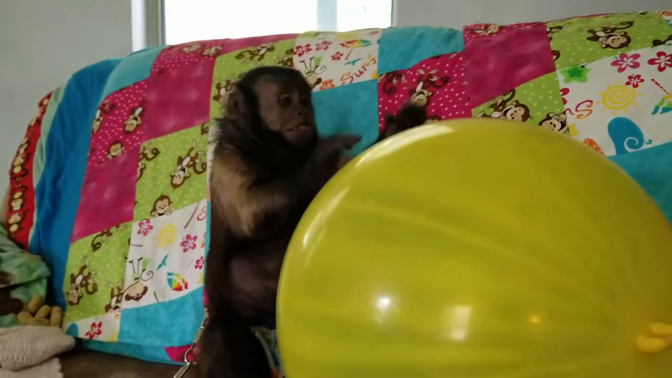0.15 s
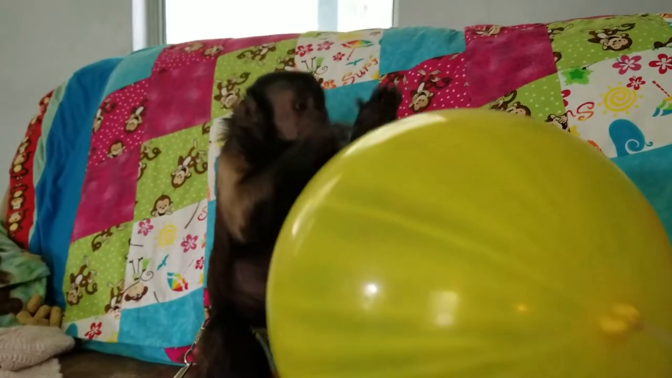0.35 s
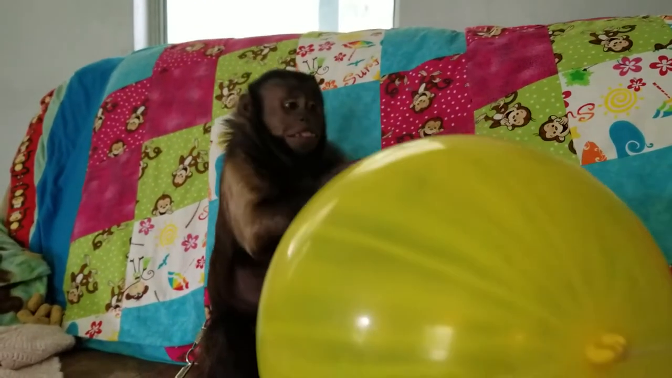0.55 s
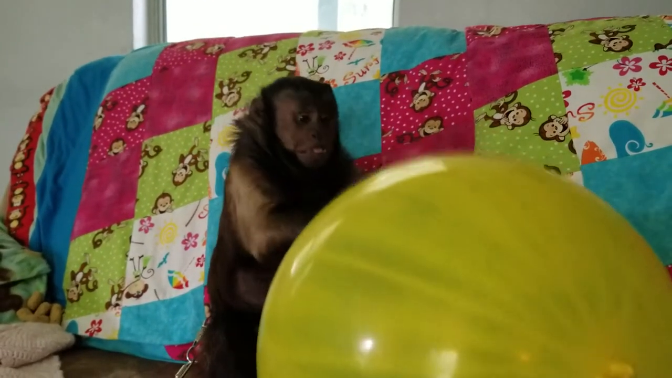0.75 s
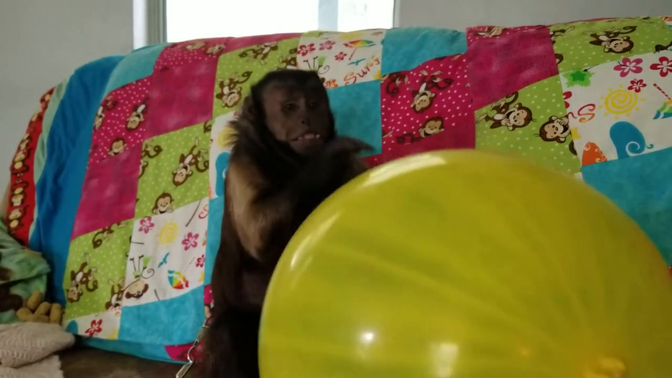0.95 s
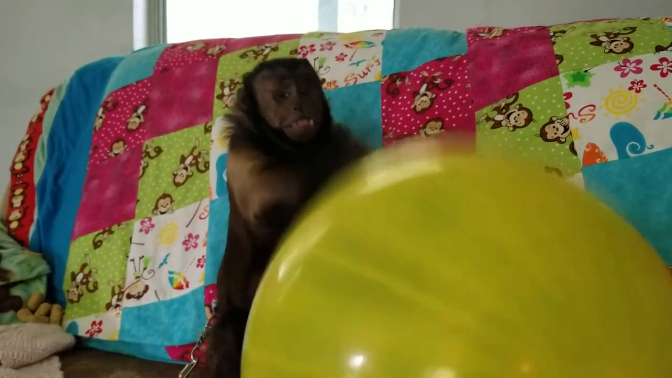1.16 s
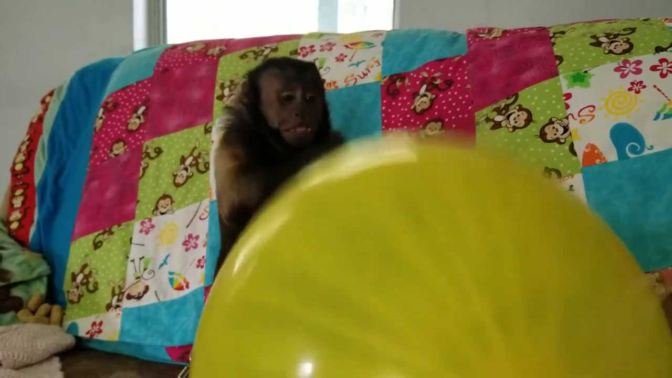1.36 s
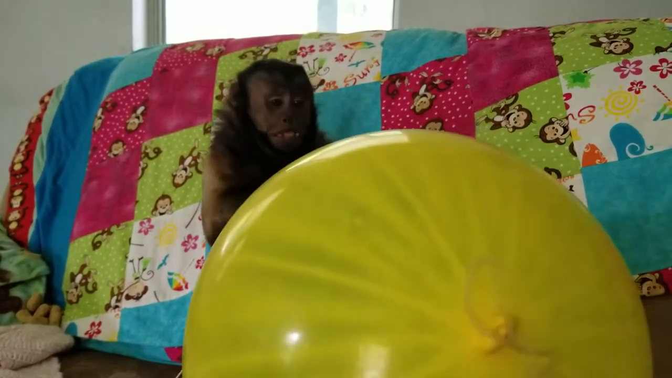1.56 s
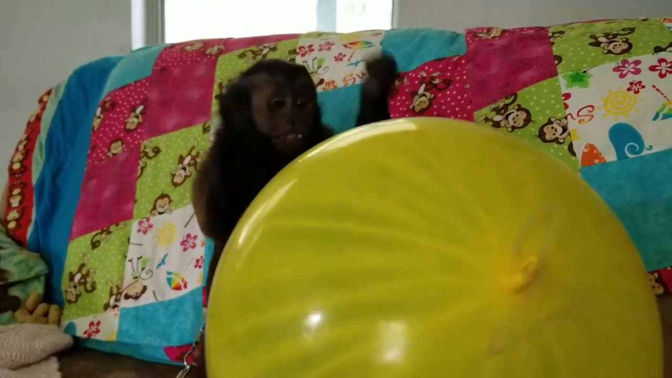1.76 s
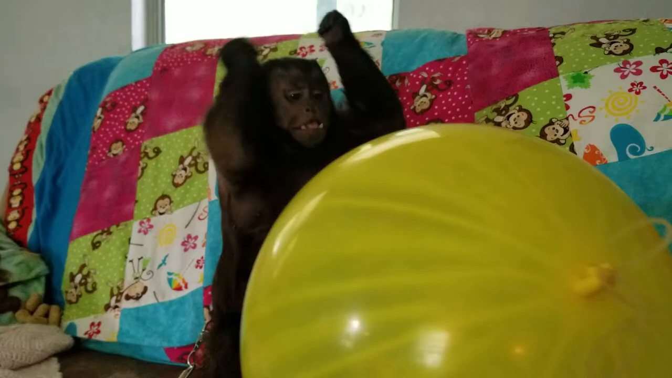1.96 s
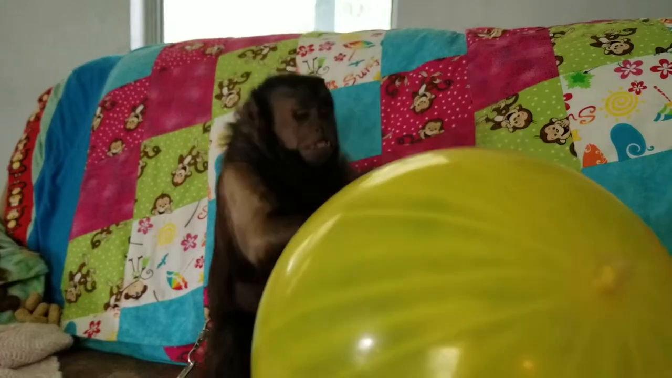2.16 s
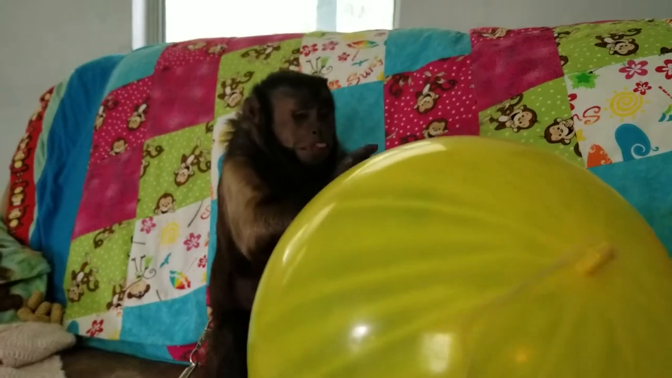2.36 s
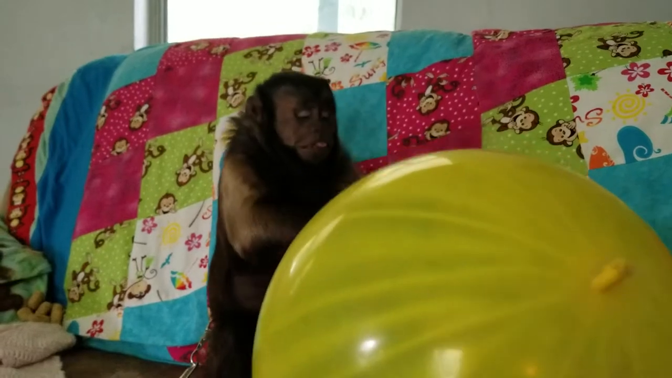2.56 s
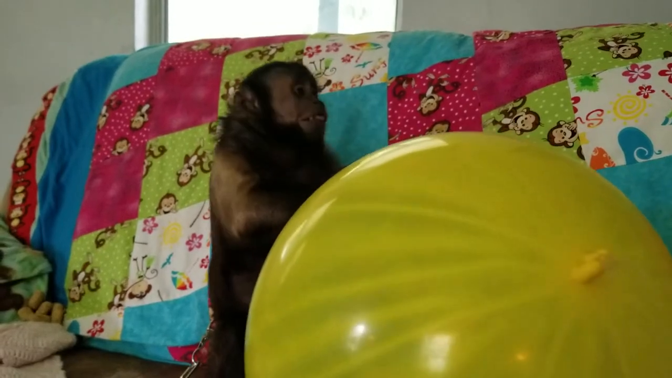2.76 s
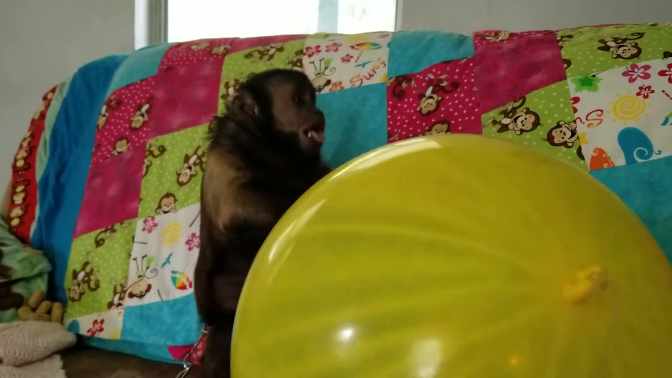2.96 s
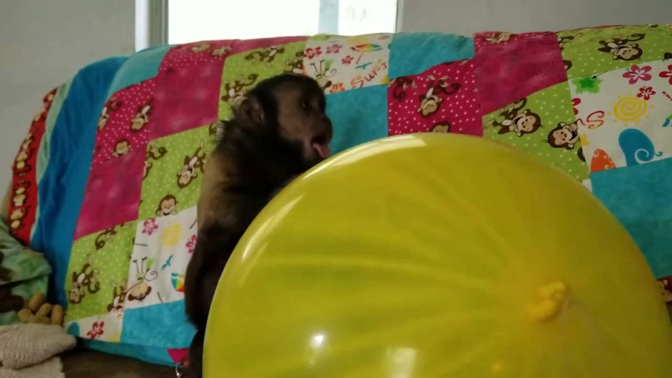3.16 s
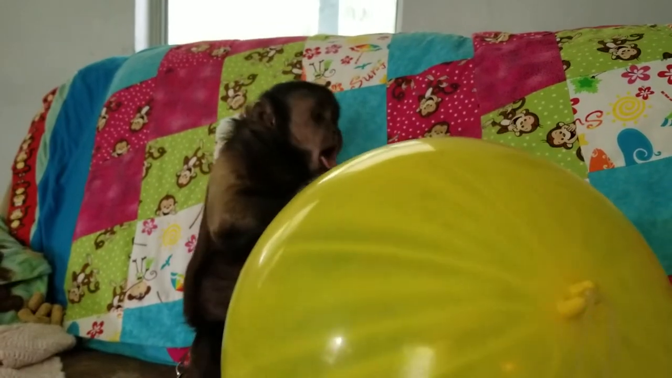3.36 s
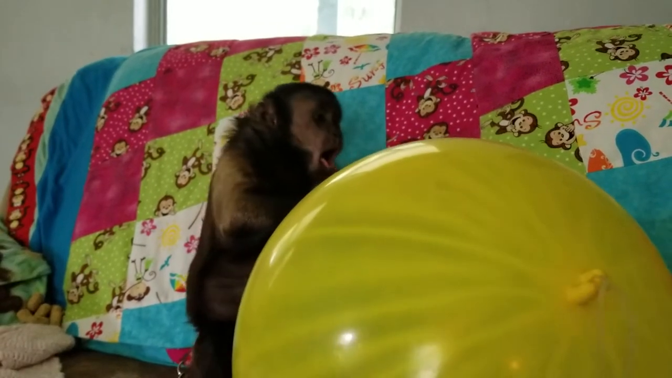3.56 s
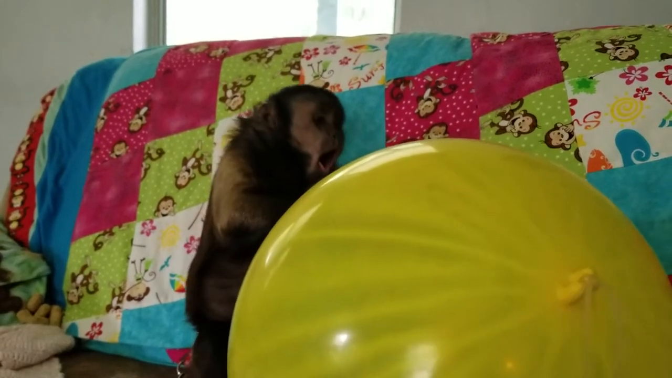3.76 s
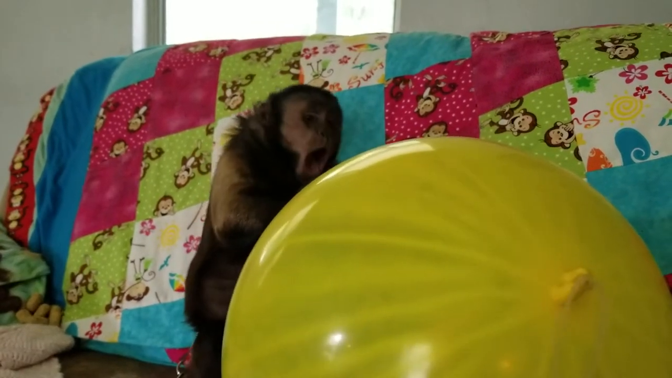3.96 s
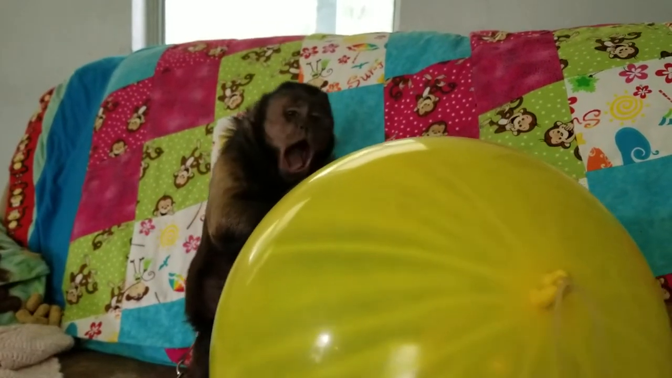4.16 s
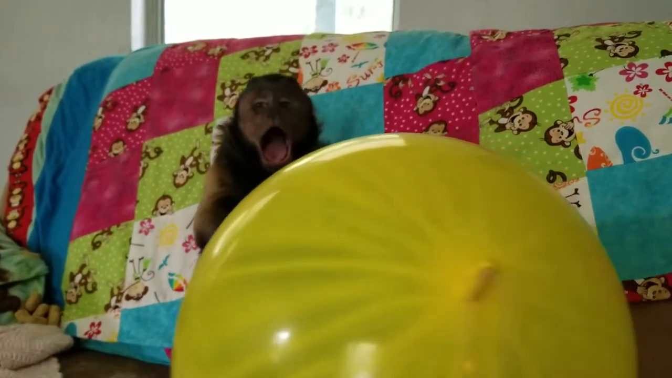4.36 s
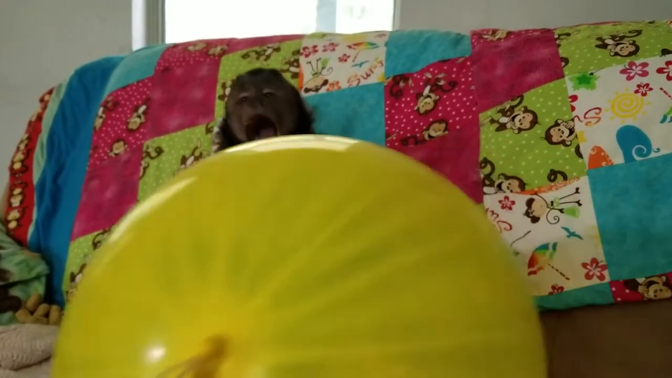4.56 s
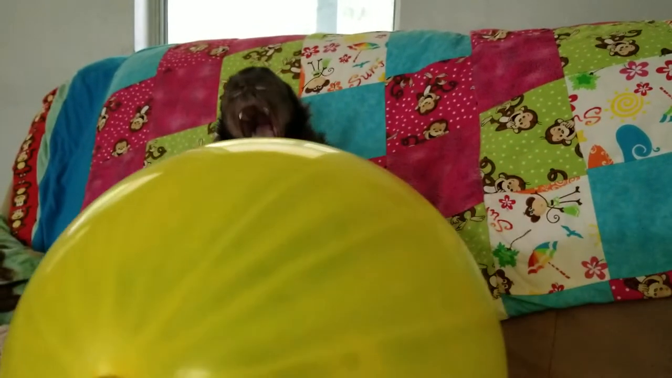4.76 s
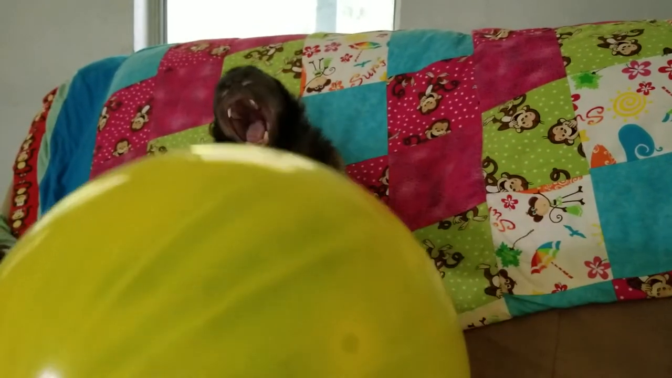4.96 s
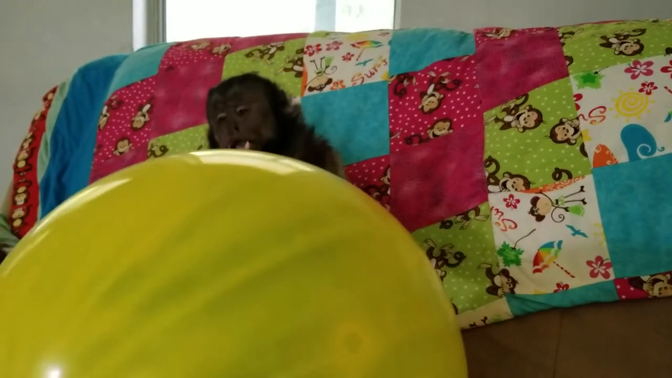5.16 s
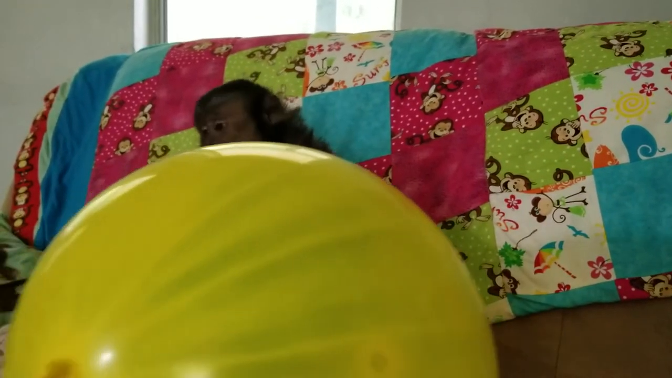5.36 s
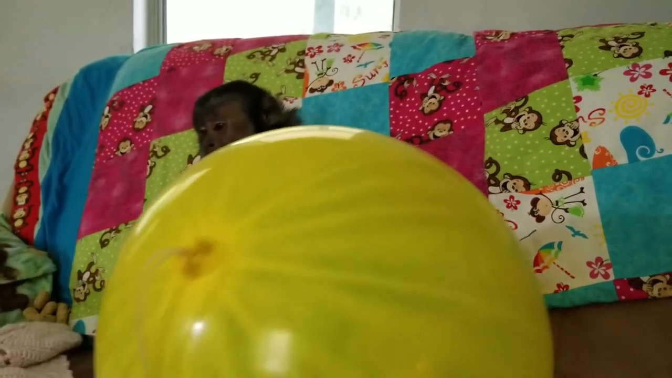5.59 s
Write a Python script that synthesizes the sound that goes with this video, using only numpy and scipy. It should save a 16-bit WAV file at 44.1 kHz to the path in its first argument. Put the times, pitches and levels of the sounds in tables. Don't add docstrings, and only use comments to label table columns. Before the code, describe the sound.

Indoors, close to a phone microphone with a steady low fan in the background, palms slap and rub a large latex balloon. Dull bassy blows ring and rock it, mixed with dry rubber rasps and fingertip flicks. The drumming pauses, returns briefly, then fades to faint brushing and light taps. Near the end come two quick swishing drags with a low groan and tiny high squeals, then only the fan.

```python
import sys
import numpy as np
from scipy import signal
from scipy.fft import rfft, irfft
from scipy.io import wavfile
from scipy.ndimage import uniform_filter1d

SR = 44100
rng = np.random.default_rng(int(sys.argv[2]) if len(sys.argv) > 2 else 0)


def master_out(mix):
    frames = np.transpose(np.atleast_2d(mix))
    ceiling = np.clip(frames, -1, 1)
    pcm = np.round(ceiling * 32767).astype(np.int16)
    wavfile.write(sys.argv[1], SR, pcm)


def volts_from_db(level):
    exponent = np.asarray(level, float) / 20
    return 10 ** exponent


N = 248150
T = np.arange(N) / SR
LONGEST = SR // 2

# frequency in Hz, level in dB per Hz.
FAN_COLOUR = [(20, -16), (40, -8), (66, 1.5), (114, -3.5), (145, -12), (260, -10), (420, -15), (600, -9),
              (1050, -6.5), (1900, -11.5), (2700, -10), (4500, -18.5), (6400, -29.5), (16000, -40.5)]
FAN_DB = -51

# start in seconds, peak in dB, push pitch in Hz, wobble minus peak in dB.
BLOWS = [(0.001, -35, 250, -0.5), (0.047, -26.5, 95, -9.5), (0.217, -38, 150, 6), (0.252, -29.5, 79.6, -2),
         (0.426, -17.5, 113, -6.5), (0.4525, -7, 154, -30), (0.462, -20, 218, -5.5), (0.481, -21, 101, -20),
         (0.509, -38, 100, 2), (0.558, -30.5, 247, -4), (0.722, -27.5, 75.5, 0), (0.772, -19.5, 71.6, -15),
         (0.942, -27, 109, -6.5), (1.159, -14.5, 113, -4), (1.1762, -15, 113, -12.5),
         (1.209, -26, 78.1, -4.5), (1.226, -27, 83.4, -21), (1.353, -24, 150, -0.5),
         (1.378, -6.5, 121, -22), (1.418, -20.5, 72.7, -7), (1.454, -31, 92, -13), (2.106, -19.5, 108, -6),
         (2.1165, -16, 50, -20), (2.1325, -14, 95, -17.5), (2.159, -38, 73.3, -6.5), (2.389, -37, 158, -5),
         (2.553, -32, 90, -1.5), (4.9805, -33.5, 80, -25)]
# start in seconds, peak in dB, push pitch in Hz.
NUDGES = [(0.021, -30.5, 99), (0.327, -27.5, 108), (0.799, -25, 72), (1, -30.5, 234), (1.062, -30, 90),
          (1.484, -38, 118), (1.51, -37, 73), (1.577, -35.5, 72.7), (1.631, -40, 223), (2.033, -38.5, 80),
          (2.19, -30, 90), (2.224, -42, 80), (2.286, -48, 95), (2.36, -28.5, 277), (2.589, -31.5, 80.7),
          (2.67, -41, 135), (2.946, -36, 100), (3.848, -37.5, 147), (4.197, -36.5, 112),
          (4.298, -42, 134.2), (4.398, -44.5, 72.7)]
NUDGE_WOBBLE_DB = -10
# frequency in Hz, level in dB, t60 in seconds.
SKIN_MODES = [(44.8, -9.5, 0.3), (63.2, -9, 0.75), (97.6, -4, 0.37), (135, -4, 0.38), (174, -5.5, 0.053),
              (241, -0.5, 0.1), (319.5, -9.5, 0.13), (500, -14, 0.087), (551, -5, 0.097), (534, -29, 0.06)]
WOBBLE_T60_S, WOBBLE_SLOPE = 0.17, -0.18
ROCK_DB, ROCK_SHARE = -29, 0.51
ROCK_RISE_S, ROCK_T60_S = 0.044, 0.76
ROCK_HZ, ROCK_DB_PER_OCTAVE = 85, 3.5
ROCK_FUR_DB, DRAG_RUMBLE_DB = -20, -3

# start in seconds, peak, body minus peak and air minus peak in dB.
SLAPS = [(0.0504, -29.5, -2, -8), (0.215, -27.5, -5, -8), (0.232, -30, -1, -9), (0.2874, -29.5, 0, -7.5),
         (0.4215, -22.5, -7.5, -8), (0.4624, -19.5, -5.5, -6.5), (0.484, -26.5, 3.5, -11),
         (0.5582, -35, -5, -10), (0.775, -32, 6, -6), (1.065, -33.5, -10, -7.5), (1.1554, -26.5, -16, -9),
         (1.1717, -20.5, -1.5, -5.5), (1.3847, -21, -7.5, 3), (1.404, -30, -6, -7), (1.442, -39, -2, -11),
         (1.6294, -46, -9, -1), (2.1385, -21.5, 2.5, -0.5), (2.158, -25.5, 0.5, -3), (2.3575, -39, 7, -12),
         (2.385, -39.5, -2, 1), (2.5264, -43, -3, 3), (2.585, -36.5, 8, 1), ]
SLAP_RISE_S, SLAP_T60_S = 0.0056, 0.13
# start in seconds, peak, body minus peak and air minus peak in dB.
WIPES = [(0.0044, -32, 1, -12), (0.2424, -31, -5, -5.5), (0.711, -30.5, -6, -3), (0.7994, -40, 2, -19),
         (0.935, -32.5, 1, -4), (0.9994, -42.5, -13, 1), (1.3535, -24.5, -10, -4),
         (2.1035, -19.5, -2.5, -5), (2.5536, -32.5, -2.5, -4), (3.849, -52, 14, -17)]
WIPE_RISE_S, WIPE_T60_S = 0.0088, 0.25
# start in seconds, peak, body minus peak and air minus peak in dB.
FLICKS = [(0.007, -30.5, 1, -9), (0.471, -18.5, 1, -5.5), (0.762, -27, 3.5, 0), (1.3985, -13.5, -2, -6),
          (1.4144, -22.5, 1, -10), (1.4345, -19.5, 3, -7), (2.145, -17, -1.5, -2.5), (2.3565, -35, 4, -10),
          (2.587, -36.5, 8, -8), (2.664, -37, 4, -1)]
FLICK_RISE_S, FLICK_T60_S = 0.003, 0.06
# start in seconds, peak, body minus peak and air minus peak in dB.
BRUSHES = [
    (2.765, -51, -14, 6),
    (2.96, -53, -8, 4),
    (3.045, -48, -9, 5),
    (3.22, -51, -5, 3),
]
BRUSH_RISE_S, BRUSH_T60_S = 0.04, 0.4
# time in seconds, speed as hiss in dB, grip in dB.
DRAGS = [
    [(4.15, -82, 15), (4.31, -63, -14), (4.416, -52.5, 5), (4.505, -54.5, -4), (4.535, -50, 9.5),
     (4.6, -45, 11.5), (4.655, -46, 10.5), (4.675, -61.5, 14.5), (4.742, -61.5, 12)],
    [(4.738, -61, 0), (4.78, -52, 2.5), (4.86, -45, 5), (4.915, -54, 10.5), (4.94, -46.5, 2),
     (4.985, -49.5, 3), (5.005, -67, 17), (5.06, -83, 22)],
]
GRIP_BODY_DB, GRIP_MIDDLE_DB = -8, -7
# frequency in Hz, level in dB per Hz.
RASP_COLOUR = [(200, -8), (330, 3.5), (750, -3), (960, -3.5), (1260, -3), (2900, -0.5), (3400, -2),
               (10400, -18), (15800, -16.5), (16400, -50.5)]
# frequency in Hz, level in dB per Hz.
FUR_COLOUR = [(2500, -28), (5000, -1.5), (9000, -4), (13000, -1), (20000, -4.5)]

# start
# in seconds, peak in dB, ring pitch in Hz.
PATCHES = [(0.244, -31, 650), (0.28, -32, 1828), (0.47, -26, 1820), (0.485, -27, 977), (1.172, -34, 638),
           (1.189, -35, 860), (1.387, -22.5, 2360), (1.399, -20, 667), (1.436, -26, 950),
           (2.105, -31, 2660), (2.143, -17.5, 1244), (2.159, -24, 2050), (2.386, -34, 1300),
           (2.587, -41, 884), (2.665, -36, 643), (4.976, -26.5, 238)]
PATCH_T60_S = 0.047
# start in seconds, peak in dB, ring pitch in Hz, bright crack in dB, t60 in seconds.
SNAPS = [
    (0.511, -30, 616, -18, 0.029),
    (0.56, -25.5, 938, -21, 0.012),
    (0.77, -21, 470, -16, 0.016),
    (1.171, -32, 526, -24, 0.032),
    (2.104, -21, 2640, -15, 0.016),
    (2.587, -26, 930, -17, 0.024),
    (2.666, -27.5, 620, -26, 0.014),
    (3.854, -35, 1340, -26, 0.0173),
]
# start in seconds, peak in
# dB.
TICKS = [(0.5595, -44), (0.999, -47), (1.4845, -41), (2.3575, -48), (2.3825, -42), (2.5097, -48),
         (4.8644, -46), (4.8704, -46), (4.8908, -33), (5.372, -44)]
# start in seconds, depth in dB, width in seconds, ring pitch in Hz.
POPS = [
    (1.1585, -27, .0009, 900),
    (1.4857, -21, .00038, 2850),
    (1.736, -32, .0005, 1500),
    (2.3587, -25, .0006, 1000),
    (2.3882, -29, .0005, 1300),
]

# start and length in seconds, slip rate in Hz, peak in dB, sharpness from 0 to 1.3.
GROANS = [
    (1.729, 0.03, 235, -45, 0.27),
    (4.526, 0.017, 232, -38.5, 0.3),
    (4.84, 0.028, 244.7, -40.5, 0.47),
    (4.885, 0.04, 240, -44.5, 0.13),
]
SQUEALS = [
    (4.568, .038, 930, -39.5, .5),
    (4.598, .056, 760, -39, .85),
    (4.634, .024, 990, -47, .3),
]
# time in seconds, slip rate in Hz, level in dB, sharpness from 0 to 1.3.
HAUL = [
    (4.547, 229, -50, .3),
    (4.56, 230, -38, .15),
    (4.578, 232, -31, .2),
    (4.6, 233, -42, .5),
    (4.626, 233, -46, .4),
    (4.643, 230, -36, .6),
    (4.656, 229, -42, .4),
    (4.67, 228, -66, .3),
]
HAUL_JITTER = 0.009
# level in dB, from the fundamental up.
GROAN_OVERTONES = [2.5, 2.5, -0.5, 6, -5, -3, -6, -7]
# level in dB, from the fundamental up.
SQUEAL_OVERTONES = [0, 1, -7, -11]
CATCH, LET_GO = 0.4, 0.6
GROAN_EDGE_DB, GROAN_EDGE_PITCH = -13, 0.95
SQUEAL_EDGE_DB, SQUEAL_EDGE_PITCH = -7, 0.97

ROOM_T60_S, ROOM_DB = 0.15, -11.5


def colour(x, points):
    hz, db = np.transpose(points)
    f = np.maximum(np.arange(N // 2 + 1) * SR / N, 1)
    gain = volts_from_db(np.interp(np.log(f), np.log(hz), db))
    return irfft(rfft(x) * gain, N)


def unit(x):
    return x / np.sqrt(np.mean(x ** 2))


def band(x, lo_hz, hi_hz):
    return signal.sosfilt(signal.butter(2, [lo_hz, hi_hz], "band", fs=SR, output="sos"), x)


def walk(rate):
    hold = int(SR / rate)
    steps = np.repeat(rng.standard_normal(N // hold + 1), hold)
    return 1.1 * uniform_filter1d(steps, hold)[:N]


def burst(s, rise, t60):
    now = slice(int(s * SR), int(s * SR) + LONGEST)
    t = np.maximum(T[now] - s, 0)
    attack = 1 - np.exp(-t / max(rise, 2e-4))
    return now, attack * np.exp(-np.log(1000) * t / max(t60, .005))


def ring(x, modes):
    out = 0
    for hz, db, t60 in modes:
        pole = np.exp(2j * np.pi * hz / SR - np.log(1000) / (t60 * SR))
        mode = signal.lfilter([1], [1, -pole], x).imag
        out = out + volts_from_db(db) * mode * np.sqrt(1 - abs(pole))
    return out


def curve(table):
    s, *columns = np.transpose(table)
    fade = np.clip(np.minimum(T - s[0], s[-1] - T) / 0.01, 0, 1)
    return [np.interp(T, s, c) for c in columns], fade


def fan():
    common, left, right = (colour(rng.standard_normal(N), FAN_COLOUR) for _ in range(3))
    both = np.array([common, np.roll(common, 15)])
    low = both - band(both, 400, 19000)
    apart = np.array([left, right])
    treble = band(apart, 450, 19000)
    drifting_low = volts_from_db(0.55 * walk(14)) * (low + 0.37 * apart)
    return volts_from_db(FAN_DB + 4.0) * unit(drifting_low + .5 * (both - low) + 0.97 * treble)


def pushes():
    return BLOWS + [(*row, NUDGE_WOBBLE_DB) for row in NUDGES]


def rocking():
    power = np.zeros(N)
    for s, db, _, _ in pushes():
        now, fade = burst(s, ROCK_RISE_S, ROCK_T60_S)
        settle = np.cos(np.pi * (T[now] - s) * SR / LONGEST / 2)
        power[now] += (volts_from_db(ROCK_DB + ROCK_SHARE * db) * fade * settle) ** 2
    return np.sqrt(power)


def blows():
    dent, wobble = np.zeros(N), np.zeros((len(SKIN_MODES), N))
    mode_hz = np.array(SKIN_MODES)[:, :1]
    for s, db, hz, wobble_db in pushes():
        now, fade = burst(s, 0.0022, WOBBLE_T60_S * (hz / 100) ** WOBBLE_SLOPE)
        turn = np.clip((T[now] - s) * hz, 0, 1)
        dent[now] += volts_from_db(db) * np.sin(2 * np.pi * turn) * np.sin(np.pi * turn) * np.exp(-1.5 * turn)
        wobble[:, now] += volts_from_db(db + wobble_db - 2.34 * abs(np.log2(mode_hz / hz))) * fade
    wobble += rocking() * volts_from_db(-ROCK_DB_PER_OCTAVE * abs(np.log2(mode_hz / ROCK_HZ)))
    for table in DRAGS:
        (fur_db, _), fade = curve(table)
        wobble += fade * volts_from_db(fur_db + DRAG_RUMBLE_DB)
    shake = np.zeros(N)
    for level, (hz, db, t60) in zip(wobble, SKIN_MODES):
        mode = unit(ring(rng.standard_normal(N), [(hz, 0, 0.31 * t60)]))
        shake += level * volts_from_db(db) * mode
    return volts_from_db(-2.0) * dent + volts_from_db(-17.5) * ring(dent, SKIN_MODES) + volts_from_db(-6.5) * shake


def rasp():
    noise = rng.standard_normal((2, N))
    size_db = 2.45 * np.minimum(rng.exponential(size=N), 6.5)
    slips = noise * volts_from_db(size_db + 1.14 * walk(250))
    body = [(220, -40), (330, 0), (1200, 0), (2400, -25), (20000, -60)]
    middle = [(600, -60), (1000, -12), (1800, 0), (5000, 0), (9000, -15), (20000, -40)]
    air = [(2000, -60), (4000, -20), (8000, 0), (20000, 0)]
    zones = []
    for zone, alike in ((body, .45), (middle, .12), (air, -.05)):
        rubber = colour(slips + alike * slips[::-1], RASP_COLOUR)
        zones.append(unit(volts_from_db(1.7 * walk(40)) * colour(rubber, zone)))
    return zones


def rubbing():
    power = np.zeros((4, N))
    for table, rise, t60 in ((SLAPS, SLAP_RISE_S, SLAP_T60_S), (WIPES, WIPE_RISE_S, WIPE_T60_S),
                             (FLICKS, FLICK_RISE_S, FLICK_T60_S), (BRUSHES, BRUSH_RISE_S, BRUSH_T60_S)):
        for s, db, body_db, air_db in table:
            now, fade = burst(s, rise, t60)
            zone_db = np.array([[body_db], [0], [air_db]])
            power[:3, now] += (volts_from_db(db - 10.0 + zone_db) * fade) ** 2
    for table in DRAGS:
        (fur_db, grip_db), fade = curve(table)
        zone_db = np.array([[GRIP_BODY_DB], [GRIP_MIDDLE_DB]])
        power[:2] += (fade * volts_from_db(fur_db + grip_db + zone_db)) ** 2
        power[3] += (fade * volts_from_db(fur_db + 3.0)) ** 2
    power[2] += (rocking() * volts_from_db(ROCK_FUR_DB)) ** 2
    fur = unit(volts_from_db(1.5 * walk(60)) * colour(rng.standard_normal((2, N)), FUR_COLOUR))
    return sum(np.sqrt(p) * zone for p, zone in zip(power, rasp() + [fur]))


def patches():
    out = np.zeros(N)
    for s, db, hz in PATCHES:
        now, fade = burst(s, 0.00094, PATCH_T60_S)
        out[now] += volts_from_db(db - 5.0) * fade * np.sin(2 * np.pi * hz * (T[now] - s))
    return out


def snaps():
    out, edges, noise = np.zeros(N), np.zeros(N), rng.standard_normal(N)
    dull, bright = unit(band(noise, 320, 2900)), unit(band(noise, 3500, 10300))
    for s, db, hz, bright_db, t60 in SNAPS:
        now, fade = burst(s, 0.0015, t60)
        crack = 0.4 * dull[now] + volts_from_db(bright_db - 4) * bright[now]
        tone = 0.72 * np.sin(2 * np.pi * hz * (T[now] - s))
        out[now] += volts_from_db(db + 2.5) * fade * (crack - tone)
        edges[now.start] = -volts_from_db(db + 6.5)
    return out + band(edges, 210, 4800)


def ticks():
    out = np.zeros(N)
    bright = unit(band(rng.standard_normal(N), 6000, 15500))
    for s, db in TICKS:
        now, fade = burst(s, 0.00028, 0.01)
        out[now] += volts_from_db(db - 6.5) * fade * bright[now]
    return out


def pops():
    dips, rings = np.zeros(N), np.zeros(N)
    for s, db, width, hz in POPS:
        now, fade = burst(s + width, 0.00037, 0.01)
        dips -= volts_from_db(db + 2.5) * np.sin(np.pi * np.clip((T - s) / width, 0, 1)) ** 2
        rings[now] += volts_from_db(db - 9.0) * fade * np.sin(2 * np.pi * hz * (T[now] - s))
    return band(dips, 180, 12000) + rings


def grip(row, edge_db, edge_pitch):
    s, length, hz, db, sharp = row
    edge, full = (hz * edge_pitch, db + edge_db, sharp), (hz, db, sharp)
    return [(s, *edge), (s + CATCH * length, *full), (s + LET_GO * length, *full), (s + length, *edge)]


def squeak(table, jitter, overtones_db):
    (hz, db, sharp), fade = curve(table)
    phase = 2 * np.pi * np.cumsum(hz * (1 + jitter * walk(220))) / SR
    tone = np.zeros(N)
    for k, own_db in enumerate(overtones_db):
        level = np.clip(sharp, .05, 1.3) ** k * volts_from_db(own_db + walk(80))
        tone += level * np.cos((k + 1) * phase - 1.06 * k)
    return np.sqrt(2) * fade * volts_from_db(db) * tone


def squeaks():
    out = squeak(HAUL, HAUL_JITTER, GROAN_OVERTONES)
    for row in GROANS:
        out += squeak(grip(row, GROAN_EDGE_DB, GROAN_EDGE_PITCH), 0.0051, GROAN_OVERTONES)
    for row in SQUEALS:
        out += squeak(grip(row, SQUEAL_EDGE_DB, SQUEAL_EDGE_PITCH), 0.0086, SQUEAL_OVERTONES)
    return out


def room(x):
    t = T[:SR // 2]
    decay = np.exp(-np.log(1000) * t / ROOM_T60_S) * (t > .004)
    mid, side = rng.standard_normal((2, len(t))) * decay
    side = 0.81 * side + band(side, 550, 20000)
    tail = np.array([mid + side, mid - side]) / np.sqrt(np.sum(mid ** 2))
    return volts_from_db(ROOM_DB) * signal.fftconvolve(x, tail, axes=1)[:, :N]


def scene():
    balloon = blows() + rubbing() + patches() + snaps() + ticks() + pops() + squeaks()
    balloon = balloon * volts_from_db(np.array([[.7], [-.7]]))
    return balloon + room(balloon) + fan()


def top_cut(x):
    return signal.sosfilt(signal.butter(12, 15860, fs=SR, output="sos"), x)


def record(dry):
    x = signal.sosfilt(signal.butter(2, 20, "high", fs=SR, output="sos"), dry)
    mix = signal.sosfilt(signal.ellip(10, .2, 70, 15800, fs=SR, output="sos"), x)
    return top_cut(mix)


dry = scene()
out = record(dry)
master_out(out)
```